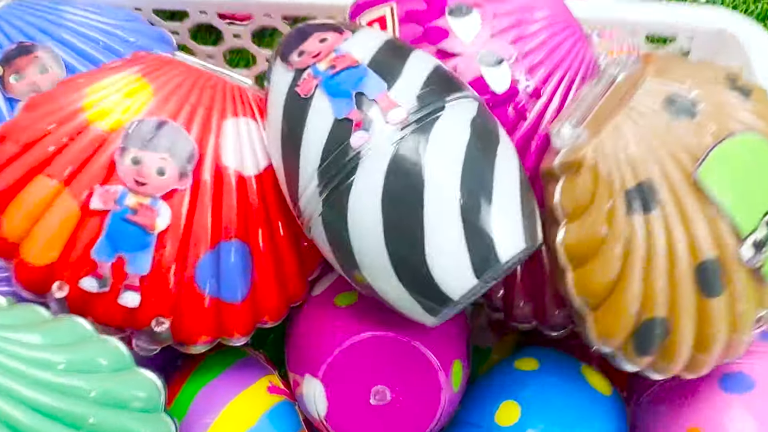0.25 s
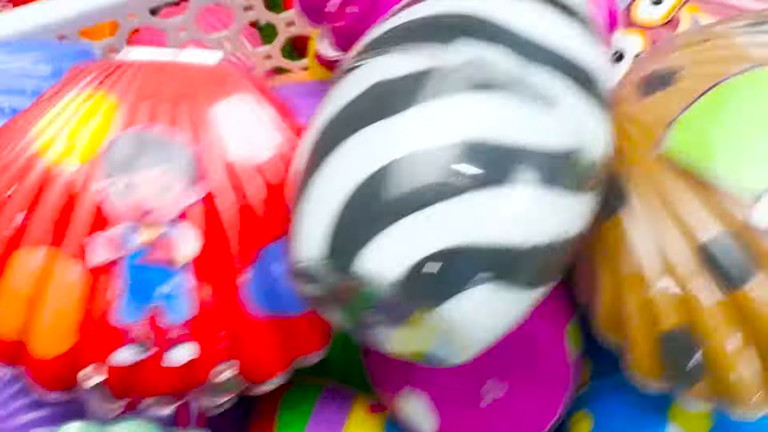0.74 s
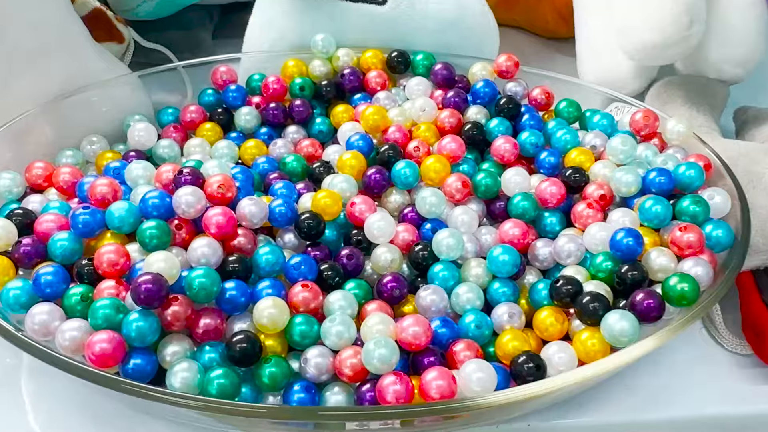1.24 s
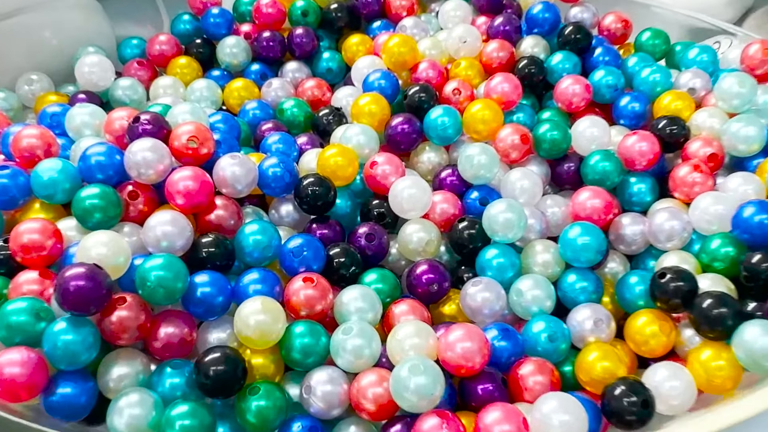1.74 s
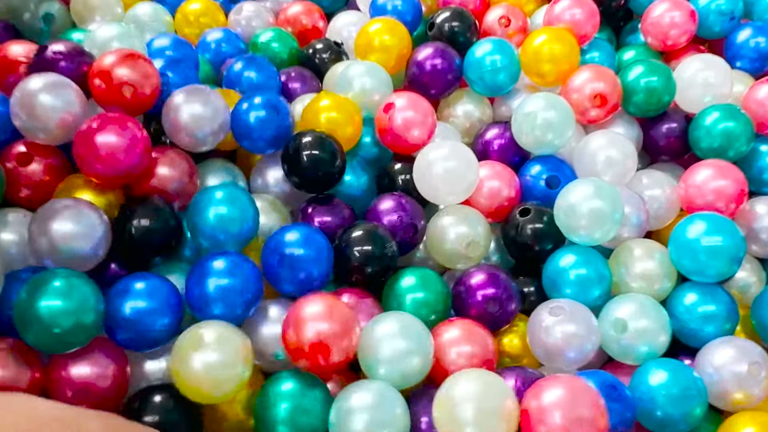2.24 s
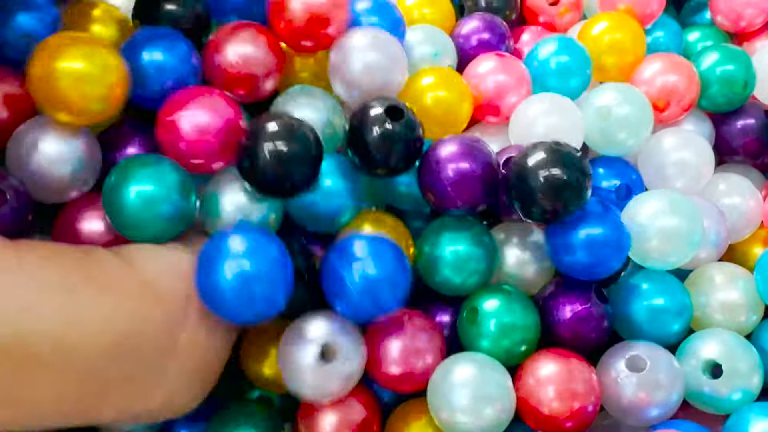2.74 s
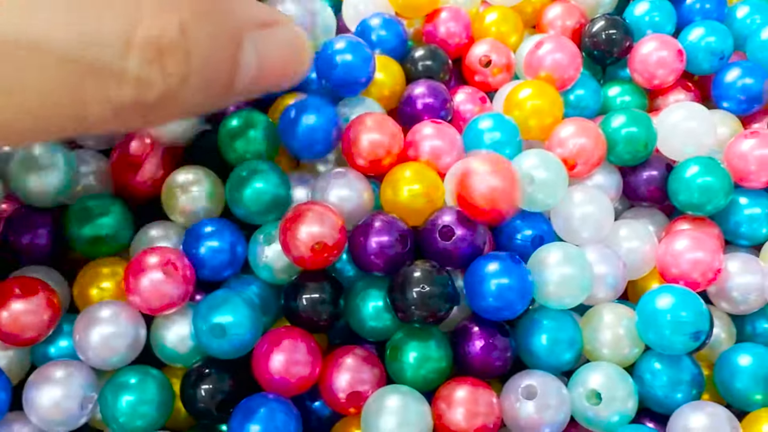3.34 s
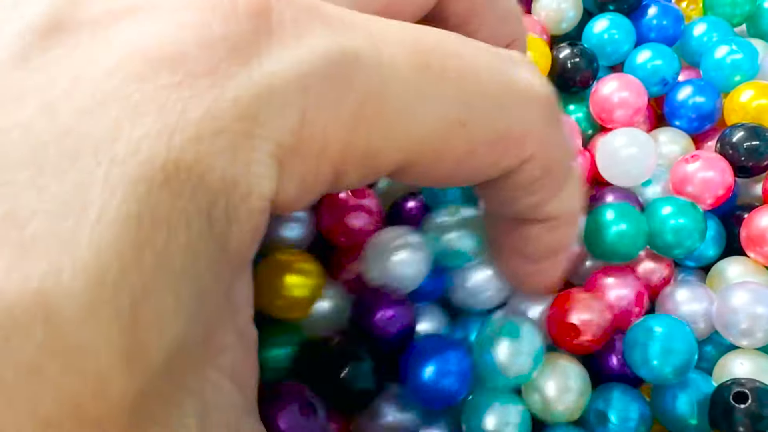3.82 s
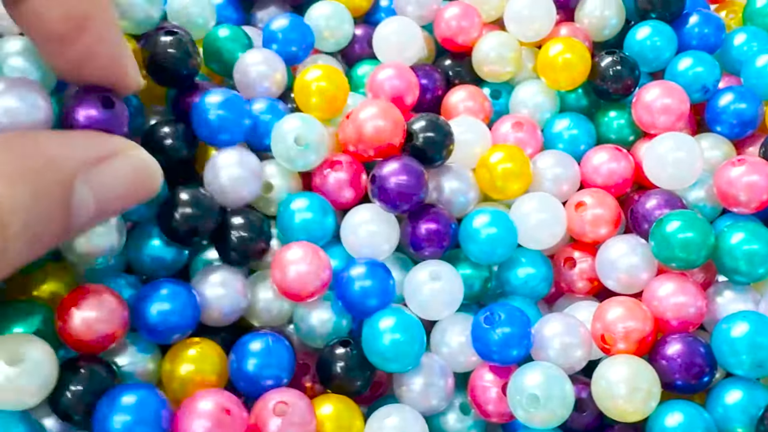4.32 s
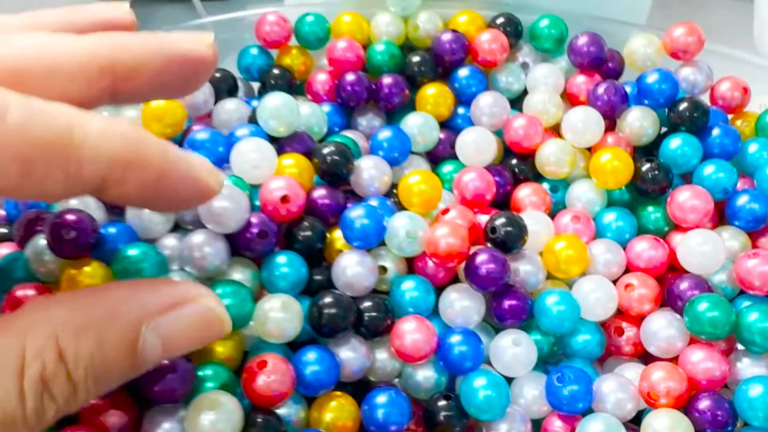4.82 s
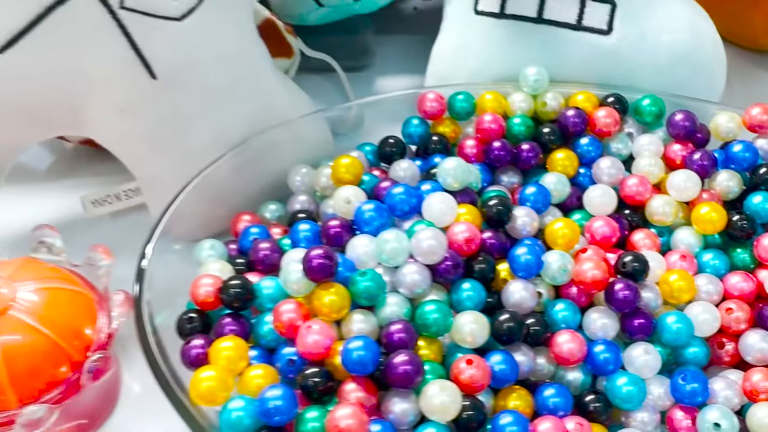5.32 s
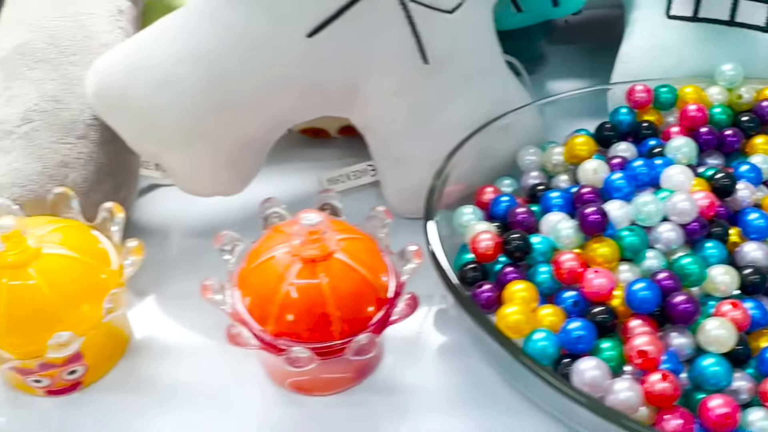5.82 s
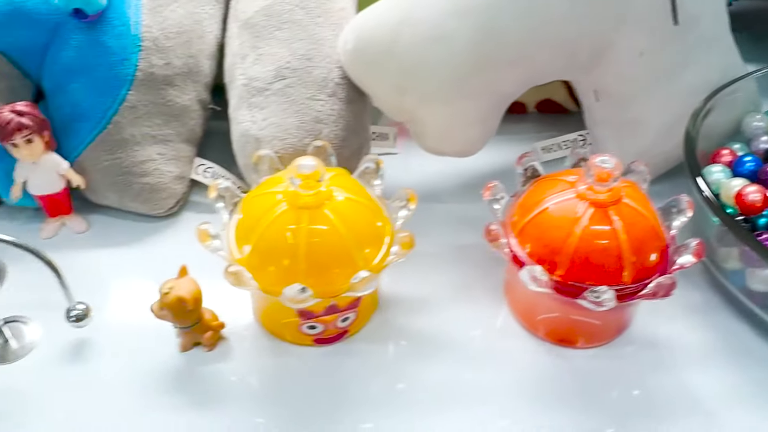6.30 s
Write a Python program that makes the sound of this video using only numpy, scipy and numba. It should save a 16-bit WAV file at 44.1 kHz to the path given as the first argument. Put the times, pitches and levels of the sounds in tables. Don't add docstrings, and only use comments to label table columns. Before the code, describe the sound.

Chunky plastic knocking cuts off dead, a quiet gap follows, then a bright hissing rattle of beads stirred by hand in glass, tumbling to rest.

```python
import sys
import numpy as np
from scipy import signal
from scipy.fft import rfft, irfft
from scipy.io import wavfile
from scipy.ndimage import uniform_filter1d, minimum_filter1d
from numba import njit

SR = 44100
rng = np.random.default_rng(int(sys.argv[2]) if len(sys.argv) > 2 else 0)


def wav_record(signal):
    frames = np.transpose(np.atleast_2d(signal))
    bounded = np.clip(frames, -1, 1)
    quanta = np.round(bounded * 32767).astype(np.int16)
    wavfile.write(sys.argv[1], SR, quanta)


def invert_db(level):
    return 10 ** (np.asarray(level, dtype=float) / 20)


N = 289296


def curves(table):
    s, *columns = np.transpose(table)
    return [np.interp(np.arange(N) / SR, s, c, left=-150, right=-150) for c in columns]


def ramp(start_s, hold_s, db, rise_db_s, fall_db_s):
    t = np.arange(N) / SR - start_s
    return db - rise_db_s * np.maximum(-t, 0) - fall_db_s * np.maximum(t - hold_s, 0)


def unit(x):
    sounding = np.mean(np.abs(x) > 1e-9)
    return x / np.sqrt(np.mean(x ** 2) / sounding)


def band(x, lo_hz, hi_hz, order=4):
    sos = signal.butter(order, [lo_hz, min(hi_hz, .45 * SR)], "band", fs=SR, output="sos")
    return signal.sosfilt(sos, x)


def resonance(x, hz, width_hz):
    return signal.lfilter(*signal.iirpeak(hz, hz / width_hz, fs=SR), x)


@njit
def ring(start, lag, left, right, pole, rise):
    out = np.zeros((2, N + 9000))
    for e in range(len(start)):
        for m in range(pole.shape[1]):
            z, p, push = 1 + 0j, pole[e, m], 1.
            for i in range(min(8000, int(-6 / np.log(abs(p))))):
                out[0, start[e] + i] += (left[e, m] * z).imag * (1 - push)
                out[1, start[e] + lag[e] + i] += (right[e, m] * z).imag * (1 - push)
                z *= p
                push *= rise
    return out[:, :N]


def own_ring(s, db, hz, t60, rise_s, pan_db, turn, lag):
    pole = np.exp(2j * np.pi * hz / SR - np.log(1000) / (t60 * SR))[:, None]
    gain = invert_db(db)[:, None] + 0j
    left = gain * invert_db(pan_db / 2)
    right = gain * invert_db(-pan_db / 2) * np.exp(1j * turn)
    lags = np.full(len(s), int(lag))
    return ring((s * SR).astype(int), lags, left, right, pole, np.exp(-1 / (rise_s * SR)))


BLUR_CYCLES = 0.59
BRIEF_ABOVE_HZ = 14300


def contacts(s, db, treble_db, pan_db, body, spectrum, loose_t60, slope, body_db, scatter_db, apart,
             rise_s, wander, count):
    body, spectrum = np.array(body), np.array(spectrum)
    chance = rng.random((len(s), 5, count + len(body)))
    every = np.ones((len(s), 1))

    low, high = np.sqrt(spectrum[[0, -1], 0])
    place = (np.arange(count) + chance[:, 0, :count]) / count
    loose = (low + place * (high - low)) ** 2
    loose_db = np.interp(np.log(loose), np.log(spectrum[:, 0]), spectrum[:, 1])
    loose_db = loose_db + 10 * np.log10(loose / 1000) / 2
    decay = loose_t60 * (loose / 1000) ** -slope * (.5 + chance[:, 1, :count])
    decay = decay / (1 + (loose / BRIEF_ABOVE_HZ) ** 4)
    loose_db = loose_db - 10 * np.log10(decay / loose_t60)

    body_hz = body[:, 0] * (1 + wander * (chance[:, 0, count:] - .5))
    hz = np.hstack([loose, body_hz])
    t60 = np.hstack([decay, every * body[:, 2]])
    mode_db = np.hstack([loose_db - loose_db.max(), every * body[:, 1] + body_db])
    gain = invert_db(mode_db + scatter_db * (2 * chance[:, 2] - 1))
    tilt_db = (treble_db - np.mean(treble_db))[:, None]
    gain = gain * invert_db(tilt_db * np.clip(np.log2(hz / 4000), -1, 1))
    gain = gain / np.sqrt(np.sum(gain ** 2, axis=1, keepdims=True)) * invert_db(db)[:, None]

    left = gain * np.exp(2j * np.pi * BLUR_CYCLES * chance[:, 3])
    right = left * np.exp(2j * apart * np.minimum(hz / 2000, 1) * (2 * chance[:, 4] - 1))
    side = np.where(chance[:, 1, -1] < .85, 1, -1)
    lag = side * (8 + 4 * chance[:, 1, -2]).astype(int)
    pole = np.exp(2j * np.pi * hz / SR - np.log(1000) / (np.clip(t60, .002, .15) * SR))
    half = invert_db(pan_db / 2)[:, None]
    return ring((s * SR).astype(int), lag, left * half, right / half, pole, np.exp(-1 / (rise_s * SR)))


BOUNCE_S, BOUNCE_DB = 0.0074, -7


def cracks(s, db, pan_db, body, spectrum, t60):
    wait, loss = rng.random((len(s), 2)).T
    s = np.hstack([s, s + BOUNCE_S * (.25 + .75 * wait)])
    db = np.hstack([db, db + 2 * BOUNCE_DB * loss])
    return contacts(s, db, 0 * s, pan_db + 0 * s, body, spectrum, loose_t60=t60, slope=0, body_db=-28,
                    scatter_db=4.5, apart=1.0, rise_s=.00006, wander=.01, count=24)


def jostle(s, db, settle_s, share):
    blows = np.zeros(N)
    np.add.at(blows, (s * SR).astype(int), invert_db(db))
    shake = signal.lfilter([1], [1, -np.exp(-1 / (settle_s * SR))], blows)
    return share * 20 * np.log10(uniform_filter1d(shake, size=350) + 0.17)


def swarm(level_db, per_s, spread_db):
    on = np.flatnonzero(level_db > -140)
    chance = rng.random((int(len(on) / SR * per_s), 3))
    place = (np.arange(len(chance)) + 40 * chance[:, 0]) / len(chance)
    at = on[(np.clip(place, 0, .999) * len(on)).astype(int)]
    db = level_db[at] - spread_db * np.log(chance[:, 1] + .03)
    pan_db = 7 * (chance[:, 2] - .5)
    return at, db, pan_db


def room(x, t60, wet_db):
    t = np.arange(int(.4 * SR)) / SR
    echo = rng.standard_normal((3, len(t))) * 1000 ** (-t / t60) * np.minimum(t / 0.00042, 1)
    echo = band(echo[:2], 1400, 4600, order=1) + band(echo[2], 62, 1000, order=1)
    echo = echo / np.sqrt(np.sum(echo ** 2, axis=1, keepdims=True))
    mono = x.mean(axis=0, keepdims=True)
    return x + invert_db(wet_db) * signal.fftconvolve(mono, echo, axes=1)[:, :N]


# [f/Hz, density/dB per Hz]
FLOOR = [(55, -2), (82, -9), (1260, -28.5), (1660, -30.5), (2800, -41.5), (12000, -46.5)]
FLOOR_DB = -73
# [start/s, hold/s, level/dB, low f/Hz, high f/Hz]
LEAKS = [(0, 0.01, -44.5, 790, 1220), (0, 0.39, -46.5, 1390, 3850), (0, 0.48, -44.5, 4100, 11740),
         (1.321, 0.012, -45, 2360, 7640), (1.339, 0.016, -57.5, 908, 1190), (4.988, 0.13, -48, 2380, 8400),
         (5.139, 0.585, -70.5, 2390, 2930), (5.145, 0.592, -60.5, 2980, 3820),
         (5.46, 0.24, -60, 3500, 8440), (5.58, 0.051, -59, 3620, 4770), (5.204, 0.54, -59.5, 7600, 12400),
         (5.36, 0.33, -60.5, 8550, 10840), (5.603, 0.095, -71.5, 792, 2450), (2.086, 0.25, -55.5, 107, 416),
         (2.483, 0.15, -56.5, 262, 520), (3.72, 0.031, -59.5, 110, 386)]
LEAK_RISE_DB_S, LEAK_FALL_DB_S = 502.5, 348.5


def quiet():
    noise = rfft(rng.standard_normal((2, 2, N)))
    f = np.arange(N // 2 + 1) * SR / N
    leaks = np.zeros((2, N))
    for s, hold_s, db, lo_hz, hi_hz in LEAKS:
        hiss = unit(irfft(noise[0] * ((f > lo_hz) & (f < hi_hz)), N))
        leaks += invert_db(ramp(s, hold_s, db, LEAK_RISE_DB_S, LEAK_FALL_DB_S)) * hiss
    hz, db = np.transpose(FLOOR)
    shape = invert_db(np.interp(np.log(f + 1), np.log(hz), db))
    floor = band(unit(irfft(noise[1] * shape, N)), 74, 7400, order=3)
    return 1.19 * leaks + invert_db(FLOOR_DB + 5.0) * floor


# [middle t/s, peak/dB, f/Hz, length/s]
BUMPS = [(0.184, -51, 60, 0.061), (0.608, -34.5, 84, 0.043), (0.88, -43, 83, 0.056),
         (1.18, -46.5, 62, .036), (1.318, -35, 1070, 0.021), (1.34, -45, 1045, .024),
         (2.089, -32.5, 67.5, 0.041), (2.39, -44, 80, 0.042), (2.117, -23.5, 122, 0.027),
         (2.14, -29.5, 68.7, 0.048), (2.201, -32, 130.3, 0.05), (2.218, -34, 86, 0.085),
         (2.292, -38, 72.4, 0.042), (2.342, -35.5, 130, 0.034), (2.5, -45.5, 316, 0.039),
         (2.526, -40.5, 96, 0.053), (2.596, -35, 67, 0.034), (3.42, -64.5, 129.8, 0.059),
         (3.727, -45, 60.7, 0.057)]
# [middle t/s, fundamental/dB, octave/dB, length/s]
SCRAPS = [(4.756, -45.5, -45, 0.092), (5.146, -65, -38.5, 0.066), (5.211, -50, -41.5, 0.038),
          (5.338, -51, -48.5, 0.081), (5.472, -47, -49, 0.12), (5.628, -47, -38.5, 0.087),
          (5.71, -48, -47.5, 0.13), (5.909, -39.5, -46.5, 0.078), (6.05, -67, -57, 0.18),
          (6.157, -51, -48.5, 0.067), (6.24, -52, -65, 0.076), (6.365, -59, -72, 0.062)]
MAINS_HZ = 50.
WOBBLE, WOBBLE_S = 0.13, 0.015
SKIRT_DB, SKIRT_S = -22.5, 0.036


def hum():
    t, out = np.arange(N) / SR, np.zeros((2, N))
    tones = list(BUMPS)
    for s, low_db, high_db, length in SCRAPS:
        tones += [(s, low_db, MAINS_HZ, length), (s, high_db, 2 * MAINS_HZ, length)]
    pace = int(WOBBLE_S * SR)
    drift = uniform_filter1d(uniform_filter1d(rng.standard_normal(N), pace), pace)
    warped = t + WOBBLE * np.cumsum(unit(drift)) / SR
    for (s, db, hz, length), (turn, skew) in zip(tones, rng.random((len(tones), 2))):
        near = slice(max(int((s - .4) * SR), 0), int((s + .4) * SR))
        after = t[near] - s
        swell = np.exp(-(after / (0.69 * np.clip(length - .015, .006, .2))) ** 2)
        swell = swell + invert_db(SKIRT_DB) * np.exp(np.minimum(after / 0.014, -after / SKIRT_S))
        clock = warped[near] if hz < 400 else t[near]
        port_phase = 0.32 * (skew - .5) * np.array([[1], [-1]])
        out[:, near] += invert_db(db + 2.5) * swell * np.sin(2 * np.pi * (hz * clock + turn) + port_phase)
    return out


# [t/s, peak/dB, f/Hz]
THUDS = [(0.149, -18.5, 230), (0.206, -22, 210), (0.289, -21, 248), (0.322, -21, 224), (0.366, -14.5, 234),
         (0.416, -19.5, 257), (0.512, -19, 222), (0.595, -22, 224), (0.631, -22.5, 282),
         (0.663, -15.5, 253), (0.749, -26.5, 237), (0.782, -22.5, 230), (0.827, -19.5, 248),
         (0.871, -14.5, 218), (0.908, -20.5, 226), (1.011, -13.5, 221), (1.094, -18, 245),
         (1.196, -18.5, 215), (1.261, -23.5, 227)]


def thuds():
    s, db, hz = np.transpose(THUDS)
    return own_ring(s, db + 5.5, hz, t60=0.1, rise_s=0.0028, pan_db=3.5, turn=.7, lag=0)


# [f/Hz, level/dB, t60/s]
BIN = [(234, -7, 0.071), (382, -8.5, 0.089), (539, -1.5, 0.031), (666, -7, 0.061), (790, -7, 0.034),
       (940, 6.5, 0.011), (1084, 2.5, 0.017), (1626, -2, 0.027)]
# [f/Hz, density/dB per Hz]
TOY = [(130, -23.5), (222, -8.5), (308, -12.5), (454, -17.5), (950, -0.5), (1300, -4.5), (2500, -4),
       (4200, -20), (7300, -18), (9800, -15.5), (12400, -27.5), (15950, -23.5)]
# [t/s, peak/dB, treble share/dB, shell f/Hz]
KNOCKS = [(0.131, -17, -16, 920), (0.143, -10.5, -12.5, 1060), (0.202, -12.5, -13, 1120),
          (0.211, -8.5, -14, 1004), (0.228, -1.5, -17, 994), (0.282, -10, -17, 1120),
          (0.319, -1, -17.5, 1060), (0.3445, -4, -13.5, 832), (0.3735, 0.5, -12.5, 952),
          (0.404, -4, -20, 910), (0.43, -9.5, -18.5, 624), (0.4493, -1, -12, 554.6),
          (0.507, -1, -18.5, 1080), (0.544, -5.5, -14.5, 940), (0.56, -6.5, -13, 802),
          (0.574, -2.5, -14.5, 720), (0.603, -10.5, -15.5, 1192), (0.609, -3, -13.5, 950),
          (0.63, -3, -11.5, 528.6), (0.64, -11, -12, 595), (0.649, -4.5, -13.5, 899), (0.664, -6, -16, 852),
          (0.688, -13.5, -22, 650), (0.709, -9.5, -23.5, 1015), (0.72, 2.5, -19, 769),
          (0.728, -1, -15.5, 937), (0.743, -2, -18, 955), (0.768, -6, -19, 930), (0.8, -5, -12, 940),
          (0.828, -8.5, -20.5, 700), (0.843, 3.5, -19, 940), (0.855, -8.5, -16, 542),
          (0.927, -6, -30.5, 900), (0.955, -8.5, -19.5, 630), (0.976, -3, -16, 802), (0.999, -8, -9, 1420),
          (1.022, -6, -16, 957), (1.035, -4.5, -12, 1065), (1.049, -9, -27, 667), (1.078, -9.5, -7, 409),
          (1.086, -2, -19, 970), (1.125, 3, -21.5, 1094), (1.144, -1.5, -18.5, 886),
          (1.162, 2.5, -20.5, 681), (1.213, -1, -15.5, 664), (1.255, -10.5, -18.5, 476)]


def knocks():
    s, db, treble_db, hz = np.transpose(KNOCKS)
    shells = own_ring(s, db - 1.0, hz, t60=.035, rise_s=0.00093, pan_db=2.0, turn=0.5, lag=20)
    return shells + contacts(s, db + 0.5, treble_db * 0.95, 6.1 + 0 * s, BIN, TOY, loose_t60=0.03,
                             slope=0.24, body_db=-6.0, scatter_db=2.0, apart=1.0, rise_s=0.00025,
                             wander=0.19, count=40)


# [t/s, peak/dB]
TICKS = [(0.228, -13), (0.2884, -19), (0.3002, -14.5), (0.3504, -14.5), (0.3554, -9.5), (0.3745, -5.5),
         (0.3864, -9), (0.4164, -18), (0.451, -7.5), (0.4564, -16), (0.5013, -4), (0.5445, -12),
         (0.5615, -9.5), (0.6305, -7), (0.7287, -8), (0.8011, -12.5), (0.9687, -10.5), (0.9876, -9.5),
         (1.0036, -13.5), (1.036, -8), (1.0774, -9), (1.1238, -11.5), (1.2126, -9), (1.255, -3.5)]
# [f/Hz, density/dB per Hz]
TICK = [(3000, -23.5), (9500, 3.5), (15500, -17.5)]


def ticks():
    s, db = np.transpose(TICKS)
    return cracks(s, db - 1.0, 3.0, BIN, TICK, t60=0.0023)


# [t/s, level/dB, treble/dB]
RUMMAGE = [
    (.07, -52, -10.5),
    (.12, -15.5, -14),
    (.26, -25.5, -14),
    (.38, -18.5, -16.5),
    (.64, -11.5, -15.5),
    (.72, -14, -16),
    (.98, -12.5, -13.5),
    (1.12, -16, -13.5),
    (1.272, -19.5, -13),
]


def rummage():
    level_db, bright_db = curves(RUMMAGE)
    s, db, _, _ = np.transpose(KNOCKS)
    shaken_db = jostle(s, db, settle_s=0.02, share=.5)
    at, db, pan_db = swarm(level_db + shaken_db, per_s=750, spread_db=4.0)
    return contacts(at / SR, db - 2.5, bright_db[at], pan_db + 1.5, BIN, TOY, loose_t60=0.032, slope=0.28,
                    body_db=-4.5, scatter_db=10.5, apart=1.0, rise_s=0.000086, wander=0.11, count=22)


SCENE_CHANGE_S, BASS_OPENS_S = 1.273, 0.16


def toys():
    t = np.arange(N) / SR
    heap = room(knocks() + ticks() + rummage() + thuds(), 0.13, -13.5)
    heap = band(heap, 175, 24000, order=4)
    shut = np.clip((BASS_OPENS_S - t) / .01, 0, 1)
    heap = heap + shut * (band(heap, 890, 24000, order=4) - heap)
    return heap * np.clip((SCENE_CHANGE_S - t) / 0.0051, 0, 1)


# [f/Hz, level/dB, t60/s]
BOWL = [(1335, -8.5, 0.028), (1473, -12.5, 0.037), (2477, 4.5, 0.015), (3093, -2, 0.028),
        (4152, -7.5, 0.03), (5204, -3, 0.018), (6400, -5, 0.042), (7020, -1, 0.031), (7710, -8, 0.062),
        (8480, -3.5, 0.04), (9340, -6, 0.044), (10074, -7, .03), (10900, -14.5, 0.032)]
# [f/Hz, density/dB per Hz]
BEAD = [(330, -25), (850, -12.5), (1100, -43), (1330, -13.5), (1750, -7), (3120, 1.5), (5800, -2.5),
        (7500, 0), (8800, 1.5), (11000, -10), (11900, -19.5), (15950, -13)]
# [t/s, peak/dB, treble share/dB]
TUMBLE = [(4.4479, -7.5, -12.5), (4.4682, -11.5, -12.5), (4.488, -8, -14), (4.497, -4.5, -12.5),
          (4.5075, -7, -8), (4.5395, -8, -9), (4.5538, -6.5, -9), (4.58, -9, -5.5), (4.5826, -5, -6),
          (4.59, -2.5, -10), (4.6234, -14, -8), (4.6394, -7, -8.5), (4.649, -10, -14), (4.6584, -10, -9),
          (4.6643, -12, -12.5), (4.6977, -19.5, -18.5), (4.7132, -10, -21), (4.7267, -11, -23),
          (4.7462, -26, -18), (4.811, -21.5, 2.5), (4.816, -5.5, -10.5), (4.8604, -8, -14),
          (4.8629, -16.5, -3), (4.876, -9.5, -21), (4.897, 0.5, -9.5), (4.9114, -4, -5.5),
          (4.9308, -8, -7.5), (4.9742, -20, -12), (5.018, -29, -13.5), (5.077, -31.5, -17.5)]


def tumble():
    s, db, treble_db = np.transpose(TUMBLE)
    rings = contacts(s, db + 1.5, treble_db * .7, 1.2 + 0 * s, BOWL, BEAD, loose_t60=0.033, slope=0.12,
                     body_db=-3.0, scatter_db=5.5, apart=0.93, rise_s=0.00025, wander=0.0023, count=36)
    return rings + cracks(s, db - 5.5, 1.5, BOWL, BEAD, t60=0.0052)


# [t/s, peak/dB, treble share/dB, loudest f/Hz]
STRIKES = [(2.0236, -21, -11.5, 10100), (2.0305, -3.5, -11.5, 4300), (2.049, 3, -15.5, 3000),
           (2.1016, 0, -16.5, 6400), (2.0785, -19.5, -8.5, 9500), (2.139, -10, -13.5, 6590),
           (2.1519, -7.5, -16.5, 4420), (2.1642, -3, -12.5, 9500), (2.182, -0.5, -15.5, 6100),
           (2.2093, -7, -24, 2420), (2.2156, -4.5, -20, 3260), (2.2677, -5.5, -15, 3240),
           (2.3037, -3, -13, 2370), (2.0585, -17, -12, 8700), (2.3416, -5.5, -6.5, 9000),
           (2.349, -0.5, -8.5, 8400), (2.4067, -10.5, -16, 9100), (2.4272, -8.5, -15.5, 6400),
           (2.4596, -8, -8.5, 8330), (2.4922, -8.5, -15.5, 3145), (2.5168, -9.5, -11, 9300),
           (2.54, -1.5, -10.5, 8700), (2.6153, 1.5, -10.5, 8900), (2.6651, -6, -11, 8340),
           (2.6843, -7, -5.5, 8450), (2.7237, -2, -8.5, 9200), (2.7669, -7.5, -13, 8900),
           (2.7824, -6.5, -12.5, 9040), (2.798, -10.5, -6, 9700), (2.8127, -10, -14.5, 8400),
           (2.831, -4.5, -14.5, 8500), (2.8588, -8, -9.5, 9100), (2.8819, -3, -13.5, 8930),
           (2.9238, -3, -12.5, 7060), (2.943, -3, -10.5, 8480), (3.008, -6, -12.5, 4100),
           (3.0283, -7.5, -10.5, 8300), (3.0768, -4, -11, 9100), (3.0969, -8, -14.5, 4230),
           (3.1201, -7.5, -9, 3760), (3.1542, -5.5, -13.5, 6330), (3.1771, -8.5, -10.5, 4080)]
# [t/s, peak/dB, treble share/dB, loudest f/Hz]
STRIKES_LATE = [(3.2095, -10, -11.5, 9260), (3.2204, -9, -7.5, 9090), (3.2472, -11, -9.5, 5080),
                (3.2559, -8, -12, 8520), (3.2642, -5.5, -8.5, 3980), (3.2961, -2.5, -9.5, 3900),
                (3.3426, -8.5, -15.5, 9410), (3.3897, -7.5, -11.5, 4450), (3.4032, -5.5, -19.5, 9490),
                (3.4287, -10.5, -16, 3040), (3.4602, -6.5, -8.5, 2550), (3.4887, -21, -13, 7680),
                (3.5061, -7, -9.5, 8500), (3.5231, -7, -6.5, 8370), (3.541, -11, -11, 5600),
                (3.565, -8, -12.5, 5170), (3.596, -4.5, -10.5, 9510), (3.6487, -8.5, -16, 5240),
                (3.6759, -10.5, -17.5, 4810), (3.6819, -12.5, -15.5, 4930), (3.7039, -10, -11, 6140),
                (3.7135, -3, -16.5, 2460), (3.759, -1.5, -10.5, 8590), (3.8189, -4.5, -6.5, 9040),
                (3.8697, -5, -7.5, 9170), (3.965, -9, -14.5, 9130), (3.9862, -5.5, -10, 7885),
                (4.0267, -8, -14.5, 8440), (4.0435, -6, -12, 8750), (4.0624, -7.5, -10, 8050),
                (4.0918, -6, -12, 6844), (4.1154, -8.5, -6.5, 9690), (4.1499, -8, -9.5, 9220),
                (4.1975, -6.5, -7, 3960), (4.235, -1.5, -9.5, 4060), (4.2674, -4, -10, 3167),
                (4.2847, -5, -13, 8880), (4.319, -1.5, -13, 3120), (4.3601, -4, -10.5, 4340),
                (4.3807, -2, -8, 3040), (4.4062, 1.5, -13.5, 6490)]
EASE_IN_S, EASE_DB_S = 2.048, 300


def eased_strikes():
    s, db, treble_db, hz = np.transpose(list(STRIKES) + list(STRIKES_LATE))
    return s, db - EASE_DB_S * np.clip(EASE_IN_S - s, 0, .02), treble_db, hz


def strikes():
    s, db, treble_db, hz = eased_strikes()
    pings = own_ring(s, db - 2.5, hz, t60=0.0094, rise_s=.0004, pan_db=8.0, turn=.3, lag=9)
    rings = contacts(s, db, treble_db * 0.98, 8.4 + 0 * s, BOWL, BEAD, loose_t60=0.02, slope=0.11,
                     body_db=-5.0, scatter_db=6.0, apart=0.82, rise_s=0.00069, wander=0.01, count=36)
    return pings + rings + cracks(s, db - 5.0, 3.5, BOWL, BEAD, t60=0.01)


# [t/s, level/dB, brightness/dB]
STIR = [(2.008, -73, -4), (2.03, -37.5, -7), (2.14, -22.5, -8), (2.24, -14.5, -6), (2.5, -15.5, -5),
        (2.9, -17, -2.5), (3.1, -19.5, 1), (3.35, -16.5, -1.5), (3.58, -27.5, -4.5), (3.72, -18, -3.5),
        (3.86, -15.5, 1), (4.2, -19, -3), (4.4, -18.5, -4), (4.52, -41.5, 5.5), (4.68, -35, -4),
        (4.78, -44, -7), (4.95, -38, -2), (5.05, -45, -4.5), (5.2, -68, 6.5)]
# [t/s, dip/dB, half length/s]
TURNS = [
    (2.397, -7.5, 0.11),
    (2.75, -4.5, 0.063),
    (3.05, 0.5, 0.065),
    (3.477, -16.5, 0.04),
    (3.798, -11.5, 0.013),
    (4.008, -9, 0.054),
]


def stir():
    t = np.arange(N) / SR
    level_db, bright_db = curves(STIR)
    for at_s, dip_db, half_s in TURNS:
        level_db = level_db + dip_db * np.clip(1 - np.abs(t - at_s) / half_s, 0, 1)
    s, db, _, _ = eased_strikes()
    shaken_db = jostle(s, db, settle_s=0.011, share=0.21) * (t < 4.44)
    at, db, pan_db = swarm(level_db + shaken_db, per_s=1400, spread_db=4.5)
    return contacts(at / SR, db - 2.0, bright_db[at], pan_db + 2.0, BOWL, BEAD, loose_t60=0.016,
                    slope=0.065, body_db=-11.5, scatter_db=12.0, apart=1.19, rise_s=0.000097,
                    wander=0.022, count=18)


# [f/Hz, width/Hz, depth 0-1]
HOLLOWS = [(1120, 330, 0.6), (1690, 350, 0.3)]


def hollows(heap):
    for dip_hz, width_hz, depth in HOLLOWS:
        heap = heap - depth * resonance(heap, dip_hz, width_hz)
    return heap


# [start/s, hold/s, added level/dB, f/Hz, width/Hz]
SWELLS = [
    (3.019, 0.26, -2, 4000, 600),
    (3.674, 0.18, 4, 1400, 329),
    (4.268, 0.18, -8.5, 3140, 260),
]
SWELL_DB_S = 146


def swells(heap):
    for at_s, hold_s, add_db, peak_hz, width_hz in SWELLS:
        gain = invert_db(ramp(at_s, hold_s, add_db, SWELL_DB_S, SWELL_DB_S))
        heap = heap + gain * resonance(heap, peak_hz, width_hz)
    return heap


# [t/s, peak/dB, hold/s]
LOW_OPENINGS = [
    (2.141, -39, 0.15),
    (2.486, -42, 0.19),
    (2.857, -54.5, 0.018),
    (3.389, -57.5, .02),
    (3.698, -40.5, 0.092),
    (4.361, -61.5, 0.06),
]
LOW_RISE_DB_S, LOW_FALL_DB_S = 206, 185


def low_range(heap):
    levels = [ramp(at_s, hold_s, peak_db, LOW_RISE_DB_S, LOW_FALL_DB_S) for at_s, peak_db, hold_s in LOW_OPENINGS]
    deep = band(heap, 604, 1690, order=4)
    deep = deep / np.sqrt(uniform_filter1d(deep ** 2, 9000) + 1e-12)
    return invert_db(np.max(levels, axis=0) + 13.5) * deep


def beads():
    heap = room(strikes() + tumble() + stir(), 0.18, -13.0)
    heap = swells(hollows(heap))
    closing = invert_db(-np.clip(np.arange(N) / SR - 4.95, 0, 1) * 87)
    middle = band(heap, 790, 2300, order=8)
    top = band(heap, 2300, 19000, order=6)
    return top - closing * middle + low_range(heap)


def scene():
    return quiet() + hum() + toys() + beads()


# [f/Hz, share alike 0-1, right lead/rad]
PORTS = [(6600, 0, -2.4), (7500, .7, -2.4), (9000, .9, -1.5), (11000, .93, 0), (12600, .93, 0),
         (14000, .6, 1.1), (16000, .7, 2.6)]
TOP_HZ = 16600


def couple_ports(dry, f):
    hz, alike, turn = np.transpose(PORTS)
    left, right = rfft(dry)
    alike = np.clip(np.interp(f, hz, alike), 0, 1)
    shared = invert_db(-2.0) * left * np.exp(1j * np.interp(f, hz, turn))
    right = np.sqrt(1 - alike) * right + np.sqrt(alike) * shared
    return np.array([left, right]) * (f < TOP_HZ)


THIN_BELOW_DB, THIN_FLOOR_DB = -32, -70
THIN_HZ, THIN_STEP_HZ = 11600, 330


def thin_top(spectrum, f):
    def power_db(v):
        return 10 * np.log10(np.abs(uniform_filter1d(v.mean(axis=0) ** 2, size=1500)) + 1e-14)

    def above(hz):
        return np.sin(np.pi / 2 * np.clip((f - hz) / 200 + .5, 0, 1)) ** 2

    x = irfft(spectrum * (1 - above(THIN_HZ)), N)
    edge_db = np.maximum(power_db(irfft(spectrum * above(3000), N)) + THIN_BELOW_DB, THIN_FLOOR_DB)
    for lo_hz in np.arange(THIN_HZ, TOP_HZ, THIN_STEP_HZ):
        part = irfft(spectrum * (above(lo_hz) - above(lo_hz + THIN_STEP_HZ)), N)
        jitter_db = 3 * np.repeat(rng.standard_normal(N // 2048 + 1), 2048)[:N]
        is_open = np.clip(power_db(part) - edge_db + jitter_db, 0, 1)
        x = x + part * uniform_filter1d(is_open, size=300)
    return x


def limit(x):
    gain = np.minimum(1, .95 / (np.abs(x).max(axis=0) + 1e-9))
    gain = minimum_filter1d(gain, 301)
    return x * uniform_filter1d(uniform_filter1d(gain, 151), 151)


def top_cut(x):
    return signal.sosfilt(signal.butter(12, 16800, fs=SR, output="sos"), x)


def record(dry):
    f = np.arange(N // 2 + 1) * SR / N
    mix = limit(thin_top(couple_ports(dry, f), f))
    return top_cut(mix)


dry = scene()
out = record(dry)
wav_record(out)
```